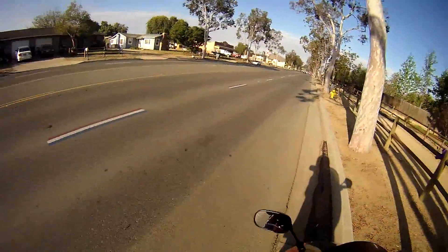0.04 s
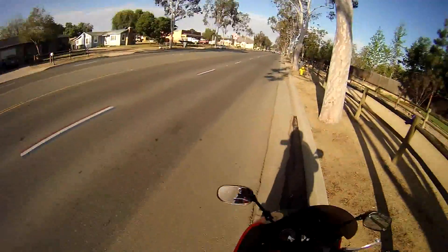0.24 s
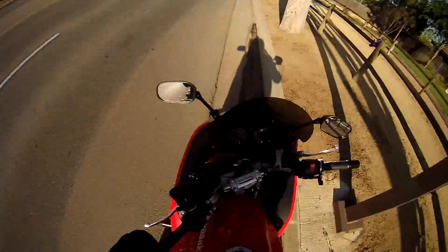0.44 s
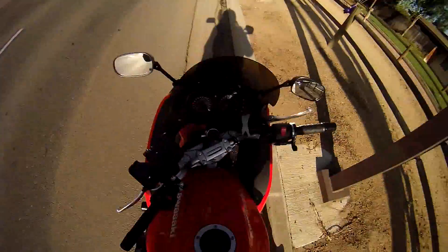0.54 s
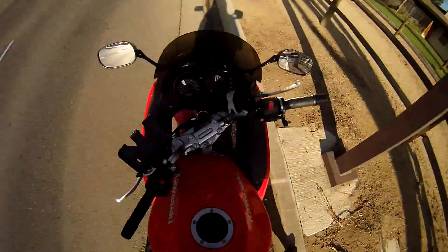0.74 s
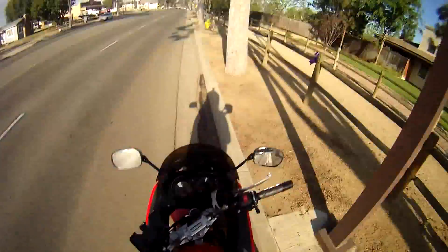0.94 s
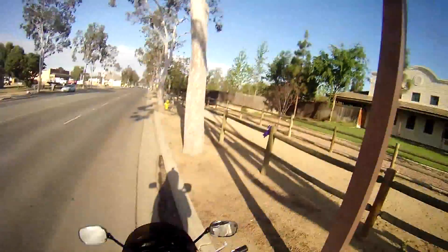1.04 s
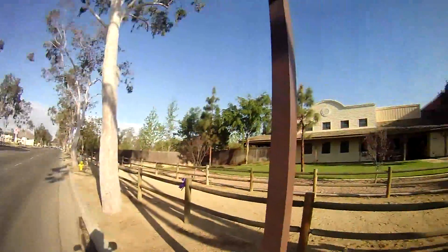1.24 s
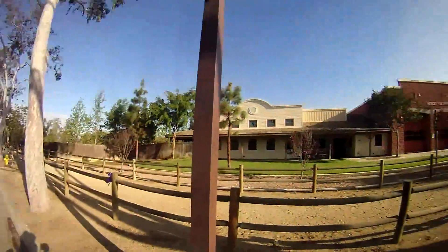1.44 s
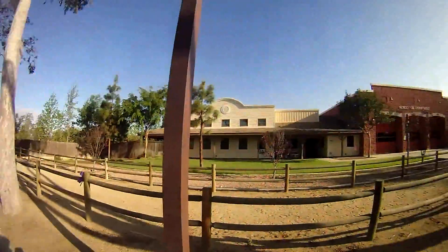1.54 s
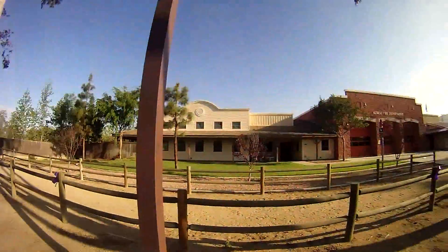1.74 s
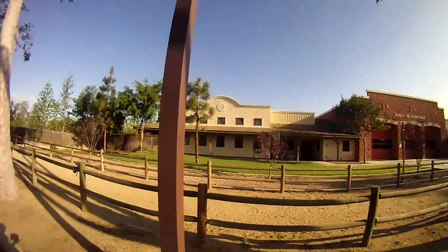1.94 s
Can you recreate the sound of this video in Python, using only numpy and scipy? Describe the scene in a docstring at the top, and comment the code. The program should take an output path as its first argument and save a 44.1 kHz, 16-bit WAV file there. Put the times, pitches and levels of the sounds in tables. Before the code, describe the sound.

Motorcycle gear is handled close to the microphone: dull bumps and clicks, a hard knock and a short plastic judder. Wind then buffets and fades into cloth rustle and a faint zip, over distant roadside traffic.

```python
"""A motorcyclist handles gear at a quiet roadside, over the rush of far traffic and a low engine hum.
As wind rises on the microphone, dull bumps, a brush of cloth and small clicks lead to a hard knock.
Right after it, stiff plastic sticks and slips in a short judder.
The wind then buffets with a hollow boom and is strongest at about one second.
As it dies down, cloth rubs again, a zip is pulled and the fabric catches once."""
import sys
import numpy as np
from scipy import signal
from scipy.fft import rfft, irfft
from scipy.io import wavfile
from scipy.ndimage import uniform_filter1d

SR = 44100
rng = np.random.default_rng(int(sys.argv[2]) if len(sys.argv) > 2 else 0)


def wav_record(signal):
    """Record a signal, one row per channel, as 16-bit PCM in the file named by sys.argv[1]."""
    frames = np.transpose(np.atleast_2d(signal))
    bounded = np.clip(frames, -1, 1)
    # unit amplitude maps onto the largest positive 16-bit level
    quanta = np.round(bounded * 32767).astype(np.int16)
    wavfile.write(sys.argv[1], SR, quanta)


N = 88200
TIME = np.arange(N) / SR
HIT_TIME = TIME[:6000]  # the clock for one short hit

# tone of the far traffic: frequency_hz, level_db
TRAFFIC_TONE = [(60, 3), (130, -4.5), (280, -5.5), (400, -2.5), (600, -4.5), (1000, -1), (1350, -3),
                (1800, -15.5), (4500, -33), (8000, -38), (12000, -72)]
# notes of a far engine: pitch_hz, level_db
ENGINE_NOTES = [(178, -44), (398, -50)]
# how the gust swells and fades: time_s, level_db
GUST_LEVELS = [(0, -43.5), (.29, -28), (.45, -27), (.6, -26.5), (.79, -24), (.89, -21), (.99, -19.5),
               (1.05, -24), (1.18, -26), (1.35, -27.5), (1.54, -28.5), (1.63, -33), (1.72, -43.5), (2, -63)]
# tone of wind on the microphone: frequency_hz, level_db
WIND_TONE = [(20, -18), (45, -5.5), (90, -0.5), (150, -2.5), (500, -13), (800, -22), (1300, -29.5),
             (1800, -33), (5000, -48), (8500, -47.5), (12000, -55)]
# dull bumps on the casing: start_s, level_db, pitch_hz, time_to_peak_s
CASING_BUMPS = [(0.144, -21.5, 171, 0.0088), (0.208, -19.5, 217, 0.0062), (.231, -11, 242, 0.0046),
                (.2372, -11, 795, 0.00023), (0.3114, -13.5, 335, 0.0067), (.3185, -3, 132, 0.0015),
                (0.3214, -23.5, 554, 0.0068), (.344, -5.5, 107, 0.0054), (.362, -4, 215, 0.0047),
                (0.3635, 0.5, 509, 0.0018), (0.382, -11, 340, 0.0021)]
# strokes of cloth: start_s, length_s, level_db, brightness_db_per_octave
CLOTH_STROKES = [(0.17, 0.16, -46, 5), (0.296, 0.11, -33.5, 2.5), (1.365, 0.28, -34, -1.3),
                 (1.512, 0.17, -37, 0), (1.745, 0.37, -39.5, -1)]
# tone of rubbing cloth: frequency_hz, level_db
CLOTH_TONE = [(200, -4.5), (900, 4.5), (1900, -6), (3500, -14.5), (5000, -17), (8000, -17), (10500, -18.5),
              (12000, -26)]
# small sharp clicks: start_s, level_db, low_edge_hz, high_edge_hz
SMALL_CLICKS = [(.209, -15, 760, 3500), (.233, -22, 800, 11100), (.2378, -8.5, 700, 12600),
                (.343, -11, 3200, 11200), (0.35, -17, 3000, 11500)]
# tone of a click before it is cut to its band: frequency_hz, level_db
CLICK_TONE = [(700, 14.5), (1250, 3.5), (1550, -5), (2150, 5), (3200, -7.5), (4600, -2.5), (7000, -7.5),
              (11500, -9.5)]
# slips of the juddering plastic: start_s, ring_db, crack_db
PLASTIC_SLIPS = [(0.3639, -16, -9), (.367, -25, -4.5), (.372, -16, -9.5), (.379, -12.5, -16),
                 (0.3845, -8.5, -4.5), (0.394, -18, -18.5), (0.3956, -10.5, -9.5), (0.3992, -14, -9.5),
                 (0.411, -12.5, -14), (.415, -8, -5.5), (0.4202, -17, -12), (.427, -11.5, -12.5),
                 (.432, -14, -12), (0.4349, -12, -11.5), (0.443, -16.5, -26), (.45, -23, -10.5),
                 (.455, -18.5, -18), (.462, -18, -16), (0.479, -25, -19), (.4848, -19.5, -17.5),
                 (.491, -18, -25), (.504, -30, -22)]
# brightness of the ring as the judder goes on: time_s, brightness_db_per_octave
RING_BRIGHTNESS = [(.37, -5.5), (.395, -3), (.43, 4.5)]
# notes the plastic shell rings with: pitch_hz, level_db, fade_s (time to fall by 60 dB)
SHELL_NOTES = [(260.4, -17, 0.08), (491, -10, 0.14), (685, -14.5, 0.04), (890, -6, 0.04), (1138, -4, 0.026),
               (1377, -6, 0.046), (1539, -11.5, 0.068), (2297, -19.5, 0.055), (3800, -45, 0.02)]
# tone of the crack of one slip: frequency_hz, level_db
CRACK_TONE = [(100, 9), (500, 5), (1450, 1), (1900, -5.5), (3400, -12), (4100, -12), (5800, -21.5),
              (7000, -38), (11500, -80)]
# a hollow boom stirred by the wind: time_s, pitch_hz, level_db
BOOM_PATH = [(.48, 135, -67), (.58, 148.3, -27.5), (.73, 166.3, -36), (.77, 174, -28), (0.831, 142.6, -23),
             (.89, 154.5, -24.5), (.94, 162.2, -28), (1.15, 175, -56)]
# one pull of the zip: time_s, teeth_per_s, level_db
ZIP_PULL = [(1.361, 85, -44), (1.424, 111, -37), (1.485, 213, -34.5), (1.539, 340, -37), (1.649, 220, -55)]
# tone of one zip tooth: frequency_hz, level_db
TOOTH_TONE = [(4000, -26), (7200, 3.5), (11500, -4)]


def gain(db):
    """Turns decibels into a number to multiply by."""
    return 10 ** (np.asarray(db) / 20)


def normalize(x):
    """Scales a signal to an average strength (rms) of 1."""
    return x / np.sqrt(np.mean(x ** 2) + 1e-20)


def octaves(hz):
    """Counts octaves above 1 kHz; anything under 200 Hz counts as 200 Hz."""
    return np.log2(np.maximum(hz, 200) / 1000)


def add(mix, start_s, sound):
    """Adds a sound to the mix at its start time."""
    part = mix[max(round(start_s * SR), 0):][:len(sound)]
    part += sound[:len(part)]


def noise(tone, size, brightness=0):
    """Makes noise of strength 1, shaped by a tone table."""
    hz = np.fft.rfftfreq(size, 1 / SR)
    tone_hz, tone_db = np.transpose(tone)
    level_db = np.interp(np.log(hz + 1), np.log(tone_hz), tone_db) + brightness * octaves(hz)
    return normalize(irfft(rfft(rng.standard_normal(size)) * gain(level_db), size))


def wander(rate_hz):
    """Makes a random wobble of strength 1, mostly slower than the given rate."""
    hz = np.fft.rfftfreq(N, 1 / SR)
    return normalize(irfft(rfft(rng.standard_normal(N)) / (1 + (hz / rate_hz) ** 2), N))


def patchy(x, depth_db):
    """Lets low and high parts of a sound swell and sink at random."""
    spectrum = signal.stft(x, nperseg=512)[2]
    patches = uniform_filter1d(rng.standard_normal(spectrum.shape), size=7, axis=0)  # smooth over pitch
    patches = normalize(uniform_filter1d(patches, size=5, axis=1))  # smooth over time
    return normalize(signal.istft(spectrum * gain(depth_db * patches))[1][:N])


def swing(hz, peak_s):
    """Makes a vibration that swells to its peak and dies away."""
    age = HIT_TIME / peak_s
    return age ** 2 * np.exp(2 * (1 - age)) * np.sin(2 * np.pi * hz * HIT_TIME)


def snap_shape(rise_s, fall_s, tail_db, tail_s):
    """Gives the loudness of a snap: a fast rise, a fast fall and a faint tail."""
    tail = gain(tail_db) * np.exp(-HIT_TIME / tail_s)
    return np.minimum(HIT_TIME / rise_s, 1) * (np.exp(-HIT_TIME / fall_s) + tail)


def traffic():
    """Far engines and tyres blend into a rush that slowly draws nearer."""
    start_db, rise_db_per_s = -39, 1.37
    return gain(start_db + rise_db_per_s * TIME) * patchy(noise(TRAFFIC_TONE, N), depth_db=2.0)


def engine_hum():
    """A far engine hums two low notes that waver and fade as it moves away."""
    out, fade_db_per_s = np.zeros(N), 3
    for pitch_hz, level_db in ENGINE_NOTES:
        wavering_hz = pitch_hz * (1 + 0.0151 * wander(rate_hz=7.54))
        out += gain(level_db) * np.sqrt(2) * np.sin(2 * np.pi * np.cumsum(wavering_hz) / SR)
    return gain(-fade_db_per_s * TIME) * out


def wind():
    """Wind buffets the microphone with a rumble, and gets brighter as the gust grows."""
    brighten, flutter_db = 0.34, 2  # brighten: extra dB of swirls for each dB of gust
    gust_db = np.interp(TIME, *np.transpose(GUST_LEVELS))
    air = patchy(noise(WIND_TONE, N), depth_db=0.7)
    rumble = signal.sosfiltfilt(signal.butter(2, 260, fs=SR, output="sos"), air)  # below 260 Hz
    swirl_db = brighten * (gust_db - gust_db.max()) + flutter_db * wander(rate_hz=10)
    swirls = (air - rumble) * gain(swirl_db)
    return gain(gust_db) * (rumble + swirls)


def bumps():
    """Each bump rocks the casing briefly and gives it a slow sway."""
    out = np.zeros(N)
    sway = gain(-28.5) * swing(hz=29, peak_s=0.019)
    for start_s, level_db, pitch_hz, peak_s in CASING_BUMPS:
        add(out, start_s, gain(level_db) * swing(pitch_hz, peak_s) + sway)
    return out


def cloth():
    """Rubbing fabric makes a grainy hiss that rises and falls with each stroke."""
    out = np.zeros(N)
    rise_share, fall_share, grain_db = 0.27, 0.55, 2.0
    for start_s, length_s, level_db, brightness in CLOTH_STROKES:
        progress = (TIME - start_s) / length_s
        stroke = np.clip(np.minimum(progress / rise_share, (1 - progress) / fall_share), 0, 1)
        out += gain(level_db) * stroke * noise(CLOTH_TONE, N, brightness)
    return out * normalize(gain(grain_db * wander(rate_hz=530)))


def clicks():
    """The gear clicks: each click is a tiny burst of noise in its own frequency band."""
    out = np.zeros(N)
    shape = snap_shape(rise_s=0.00094, fall_s=0.00093, tail_db=-21, tail_s=0.0093)
    for start_s, level_db, low_hz, high_hz in SMALL_CLICKS:
        band = signal.butter(2, [low_hz, high_hz], "bandpass", fs=SR, output="sos")
        hiss = normalize(signal.sosfilt(band, noise(CLICK_TONE, len(HIT_TIME))))
        add(out, start_s, gain(level_db) * shape * hiss)
    return out


def judder():
    """Stiff plastic sticks and slips; each slip cracks and rings the shell, dull at first, then bright."""
    out = np.zeros(N)
    shape = snap_shape(rise_s=0.00052, fall_s=0.0019, tail_db=-15.5, tail_s=0.018)
    for start_s, ring_db, crack_db in PLASTIC_SLIPS:
        brightness = np.interp(start_s, *np.transpose(RING_BRIGHTNESS))
        ring = np.zeros(len(HIT_TIME))
        for k, (pitch_hz, level_db, fade_s) in enumerate(SHELL_NOTES):
            fade = gain(level_db + brightness * octaves(pitch_hz) - 60 * HIT_TIME / fade_s)
            detuned_hz = pitch_hz * (1 + 0.033 * rng.standard_normal())
            ring += (-1) ** k * fade * np.sin(2 * np.pi * detuned_hz * HIT_TIME)  # every other note flips
        crack = shape * noise(CRACK_TONE, len(HIT_TIME))
        add(out, start_s, gain(ring_db) * ring + gain(crack_db) * crack)
    return out


def boom():
    """The wind sets air ringing with a hollow, wavering note."""
    time_s, pitch_hz, level_db = np.transpose(BOOM_PATH)
    wavering_hz = np.interp(TIME, time_s, pitch_hz) * (1 + 0.026 * wander(rate_hz=16))
    loudness = gain(np.interp(TIME, time_s, level_db, left=-np.inf, right=-np.inf))
    return loudness * np.sqrt(2) * np.sin(2 * np.pi * np.cumsum(wavering_hz) / SR)


def zipper():
    """The slider ticks over each tooth, speeding up and then easing off."""
    tick_s = 0.00079
    time_s, teeth_per_s, level_db = np.transpose(ZIP_PULL)
    speed = np.interp(TIME, time_s, teeth_per_s) * np.exp(0.076 * wander(rate_hz=110))
    since_tooth_s = (np.cumsum(speed) / SR % 1) / speed
    loudness = gain(np.interp(TIME, time_s, level_db, left=-np.inf, right=-np.inf))
    return loudness * np.exp(-since_tooth_s / tick_s) * noise(TOOTH_TONE, N)


def scuff():
    """The fabric catches once with a short, nasal scrape."""
    start_s, length_s, level_db = 1.512, 0.05, -36.5
    centre_hz, width_hz = 1710, 900
    hz = np.fft.rfftfreq(N, 1 / SR)
    band = 1 / (1 + (2 * (hz - centre_hz) / width_hz) ** 2)
    scrape = normalize(irfft(rfft(rng.standard_normal(N)) * band, N))
    progress = np.clip((TIME - start_s) / length_s, 0, 1)
    return gain(level_db) * np.sin(np.pi * np.sqrt(progress)) * scrape


def scene():
    """Adds the near and far sounds together at one microphone."""
    near = bumps() + clicks() + judder() + wind() + boom() + cloth() + scuff() + zipper()
    far = traffic() + engine_hum()
    return (near + far)[None]


def record(dry):
    """The hardest knock overloads the microphone; then the highest treble is cut away."""
    treble_cut = signal.firwin(255, cutoff=11700, window=("kaiser", 8), fs=SR)
    return signal.oaconvolve(np.clip(dry, -1, 1), treble_cut[None], "same")


dry = scene()
out = record(dry)
wav_record(out)
```